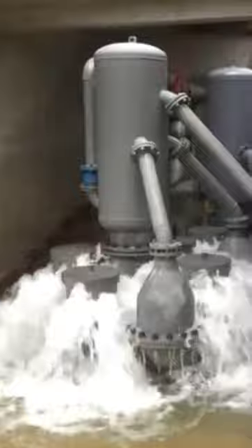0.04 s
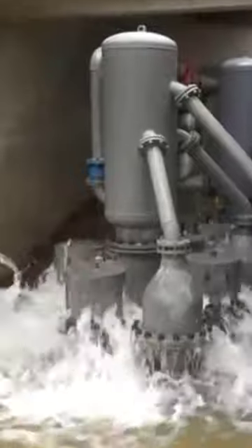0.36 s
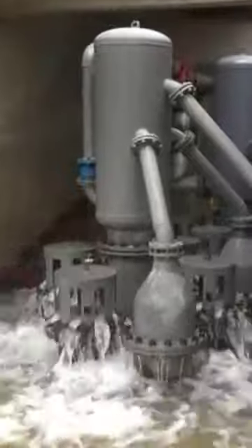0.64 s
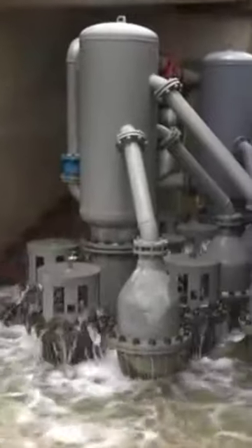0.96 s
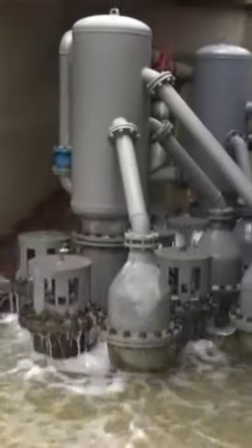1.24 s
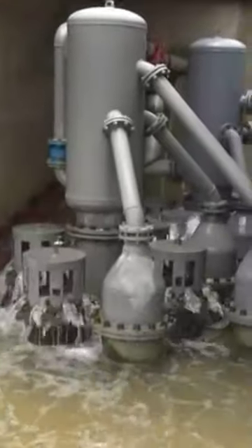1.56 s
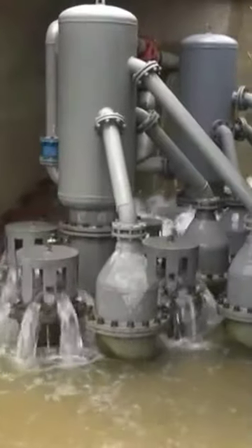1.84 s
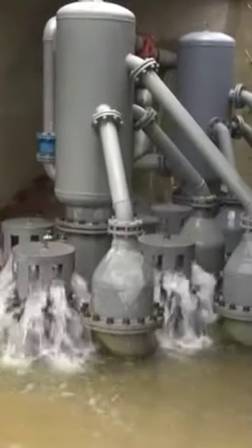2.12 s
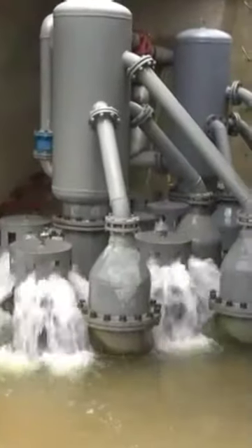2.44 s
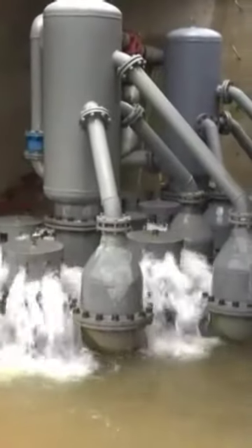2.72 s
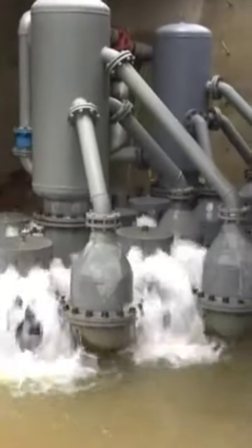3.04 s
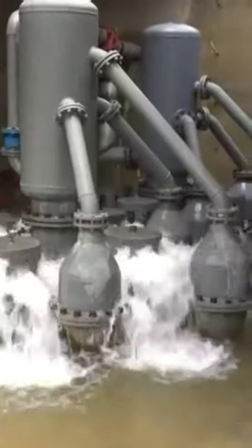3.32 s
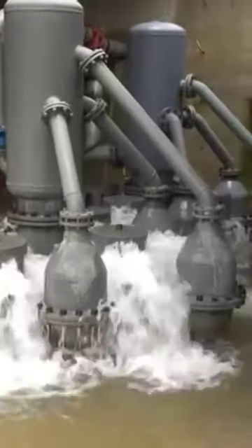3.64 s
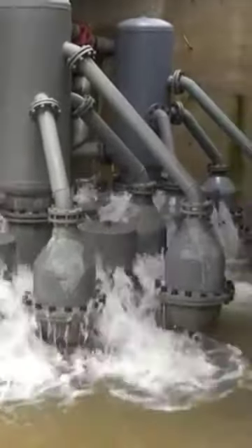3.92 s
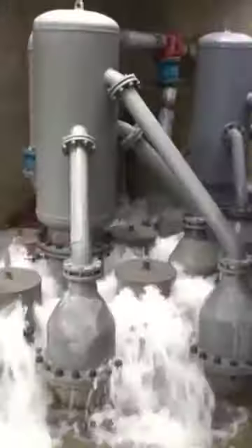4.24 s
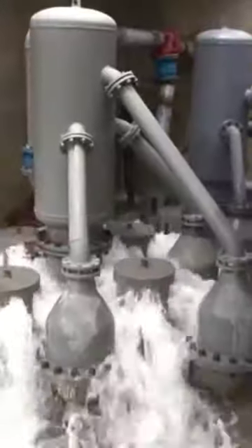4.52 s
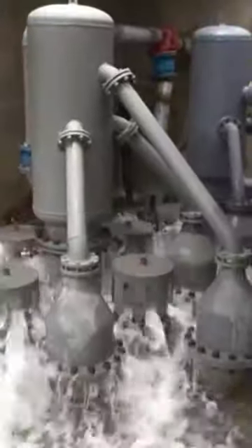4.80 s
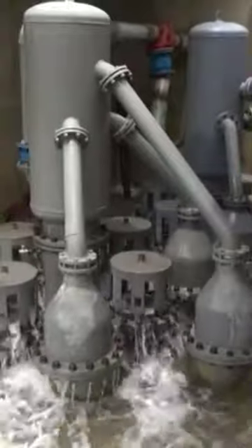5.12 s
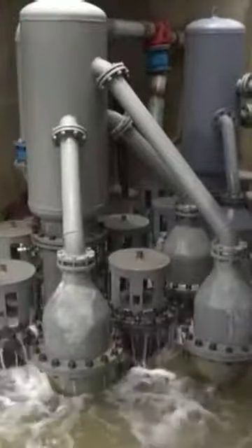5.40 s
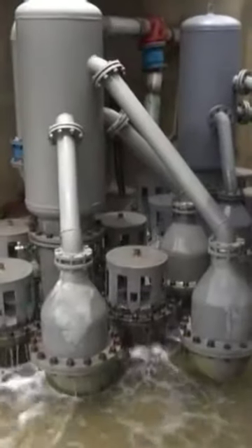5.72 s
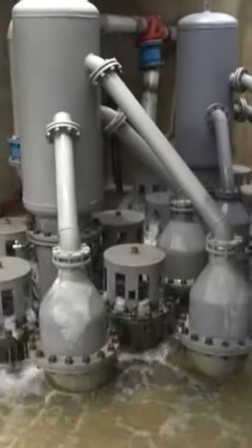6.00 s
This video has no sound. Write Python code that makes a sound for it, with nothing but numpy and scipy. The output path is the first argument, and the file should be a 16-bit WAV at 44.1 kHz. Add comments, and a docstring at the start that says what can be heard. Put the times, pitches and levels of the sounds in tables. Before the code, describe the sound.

Water rushes and splashes from the valves of large steel pumps in a concrete basin. Right at the start, valves slam shut with a deep boom, rebounding thuds, a metallic clank and a splashy crash, trailed by a thin high squeal. The water eases around 1 second, then swells. From about 1.7 to 2.3 seconds a second cluster of thuds arrives, with sharp rattling clanks and a hollow steel hum that rings on. The gush builds to its strongest near 3.8 seconds, when the longest round begins: heavy booms, knocks, crashes, bright snaps and short squeals, with another big slam at about 4.7 seconds. From 5 seconds the flow drains to a trickle, with hollow glugs, faint stuttering squeals and a fading low pipe drone. Near 6 seconds the water builds again. The sound is nearly mono, with the loudest thuds slightly squashed.

```python
"""Hydraulic ram pumps slam and boom in a concrete basin.
Water gushes ever faster from their waste valves until they slam shut, one after another. Each slam
booms up its drive pipe and comes back as a second thud, often with a splashy crash. Steel rings, shut
valves squeal and air pockets gulp, while a limiter turns everything down during the heaviest thuds."""
import sys
import numpy as np
from scipy import signal
from scipy.fft import rfft, irfft, next_fast_len
from scipy.io import wavfile
from scipy.ndimage import uniform_filter1d

SR = 44100
rng = np.random.default_rng(int(sys.argv[2]) if len(sys.argv) > 2 else 0)


def to_wav(sig):
    """Store sig (one row per channel, or 1-D mono) as 16-bit WAV at the path in sys.argv[1].

    Samples outside -1..1 are clipped; the rate is SR.
    """
    pcm = np.clip(np.atleast_2d(sig), -1, 1) * 32767
    pcm = np.round(pcm).astype(np.int16)
    wavfile.write(sys.argv[1], SR, pcm.T)  # frames by channels


N = 276066
T = np.arange(N) / SR
HZ = np.fft.rfftfreq(N, 1 / SR)

# Pressure surges behind the shut valves. Each row: start in seconds, pump name, force in dB,
# swell time in seconds, starting pitch in Hz.
SLAMS = [(0.106, "far", -16.5, 0.02, 215.6), (0.187, "near", -6.5, 0.035, 208),
         (1.712, "far", -21, 0.016, 227), (1.871, "next", -16, 0.031, 241.7),
         (2.02, "next", -21, 0.036, 246), (3.77, "far", -18.5, 0.017, 205),
         (3.812, "near", -8, 0.058, 222.8), (4.236, "next", -26.5, 0.029, 203),
         (4.58, "far", -23.5, 0.0085, 205), (4.656, "near", -10, 0.034, 200.8)]


def slams(rise=0.0072, sag_s=0.0837, overtone_ratio=2.36, overtone_db=-17.5, rebound_rumble_db=-9):
    """Water hammer: pressure swells and booms until its wave returns; then the water rebounds."""
    # Each pump: the wave's round trip and the fade time in seconds, resting pitch in Hz,
    # and the dB added to the force for boom, rumble and knock.
    pumps = { "near": dict(trip_s=0.164, t60=0.5, rest_hz=189.1, boom_db=3.5, rumble_db=-5.5, knock_db=-2),
             "next": dict(trip_s=0.14, t60=1.15, rest_hz=228, boom_db=0.5, rumble_db=-6, knock_db=0.5),
             "far": dict(trip_s=0.067, t60=0.34, rest_hz=205, boom_db=1, rumble_db=-5.5, knock_db=-27), }
    # The water bouncing back. Each row: start in seconds, boom in dB, hold in seconds, pitch in Hz,
    # knock in dB.
    rebounds = [(0.26, -13, 0.016, 203, -17.5), (0.316, -16, .015, 207, -24),
                (0.395, -21.5, 0.071, 222.8, -36), (0.525, -28, 0.04, 222, -30),
                (0.628, -43, 0.08, 211.3, -34), (1.786, -31, 0.064, 224, -29.5),
                (1.967, -14.5, 0.06, 228, -14.5), (2.142, -19, .11, 226.3, -20.5),
                (2.273, -27.5, 0.095, 230, -29), (3.995, -21, 0.099, 220.1, -27.5),
                (4.14, -30, 0.03, 213.7, -30), (4.381, -14, 0.024, 234.7, -21.5),
                (4.457, -27, 0.032, 205, -32.5), (4.635, -25, 0.026, 209.6, -31),
                (4.816, -22, .018, 236.6, -28), (4.89, -24, 0.028, 235, -27.5),
                (4.942, -27.5, 0.035, 228, -32.5), (5.013, -30, 0.022, 188.3, -50)]
    # Tone colours of the rumble and the knock. Each row: frequency in Hz, level in dB.
    rumble_spectrum = [(25, -17), (68, -7), (92, 0.5), (160, 2.5), (230, -2.5), (330, -14), (500, -39),
                       (1500, -36), (15000, -87)]
    knock_spectrum = [(150, -20), (290, 7), (470, 2), (620, -2), (950, -5.5), (1300, -14), (1700, -8),
                      (2700, -18), (4500, -27), (8000, -70), (15000, -68)]
    boom, rumble_power, knock_power = np.zeros((3, N))
    for start, name, db, swell_s, hz in SLAMS:
        pump, age = pumps[name], np.maximum(T - start, 0)
        swell = np.minimum(age / swell_s, 1) ** 2.8
        force = amp(db) * swell * burst(start, swell_s, pump["t60"], rise)
        force *= burst(start, pump["trip_s"], t60=0.14, rise=rise)  # the returning wave ends the push
        pitch = pump["rest_hz"] + (hz - pump["rest_hz"]) / (1 + (age / sag_s) ** 8)
        overtone = amp(overtone_db) * waver(overtone_ratio * pitch, wander_hz=20.1, rate_hz=50)
        boom += force * amp(pump["boom_db"]) * (waver(pitch, wander_hz=11.2, rate_hz=47.5) + overtone)
        rumble_power += (force * amp(pump["rumble_db"])) ** 2
        knock_power += (force * amp(pump["knock_db"])) ** 2
    for start, db, hold, hz, knock_db in rebounds:
        rebound = burst(start, hold, t60=0.25, rise=rise)
        boom += rebound * amp(db) * waver(hz, wander_hz=10.42, rate_hz=44)
        rumble_power += (rebound * amp(db + rebound_rumble_db)) ** 2
        knock_power += (rebound * amp(knock_db)) ** 2
    rumble = np.sqrt(rumble_power) * noise(rumble_spectrum)
    return boom + rumble + np.sqrt(knock_power) * noise(knock_spectrum)


def valve_blows():
    """A heavy valve strikes its seat, the rim it shuts against: a dull thud under a rough knock."""
    # Strikes and bounces. Each row: start in seconds, thud in dB, knock in dB, hold in seconds.
    blows = [(0.125, -27, -45, .035), (0.191, -19, -18, 0.027), (0.345, -23.5, -23, 0.026),
             (1.712, -26, -33, 0.021), (1.878, -19, -20, 0.012), (1.909, -22, -7.5, 0.0075),
             (1.963, -26.5, -16, 0.058), (2.103, -19, -28, 0.028), (3.774, -32, -26, 0.034),
             (3.815, -17.5, -21, 0.052), (4.044, -30, -22, 0.019), (4.234, -24.5, -25.5, 0.045),
             (4.31, -22, -27, 0.024), (4.341, -34, -19, 0.026), (4.564, -29.5, -34.5, 0.022),
             (4.664, -17, -17, 0.013)]
    # Tone colours of the thud and the knock. Each row: frequency in Hz, level in dB.
    thud_spectrum = [(25, -26), (68, -15), (92, 0.5), (140, 8), (220, 1), (400, -18), (1500, -45)]
    knock_spectrum = [(130, -18), (280, 5.5), (450, 4), (650, -1.5), (1000, -8.5), (2500, -16), (4500, -24),
                      (8000, -45)]
    thud_power, knock_power = np.zeros((2, N))
    for start, thud_db, knock_db, hold in blows:
        contact = burst(start, hold, t60=0.11, rise=0.0019)
        thud_power += (contact * amp(thud_db)) ** 2
        knock_power += (contact * amp(knock_db)) ** 2
    return np.sqrt(thud_power) * noise(thud_spectrum) + np.sqrt(knock_power) * noise(knock_spectrum)


def recoils(grit_db=2):
    """The returning wave collapses cavities in the water with a crash, a splash and bright snaps."""
    # Cavities collapsing. Each row: start in seconds, crash in dB, hold in seconds, splash in dB.
    crashes = [(0.342, -24.5, 0.088, -26.5), (2.035, -25, 0.035, -28.5), (3.891, -18, 0.046, -35),
               (4.022, -25.5, 0.07, -34), (4.834, -24, 0.052, -33.5)]
    # The sharpest collapses. Each row: start in seconds, level in dB.
    snaps = [(2.042, -40), (3.997, -25), (4.784, -42), (4.812, -31), (4.841, -19.5)]
    # Tone colours of the three sounds. Each row: frequency in Hz, level in dB.
    crash_spectrum = [(100, -46), (400, 13.5), (900, 6.5), (1350, 9), (1750, 11.5), (2200, 5), (3000, 3),
                      (4300, -0.5), (5500, -14), (9000, -25), (15000, -31)]
    splash_spectrum = [(200, -20), (1500, 8), (4500, 12), (8000, -4.5), (11000, 0), (15000, 3)]
    snap_spectrum = [(1000, -20), (4500, -2), (9000, -11), (13000, -7), (15000, 8)]
    crash_power, splash_power = np.zeros((2, N))
    for start, db, hold, splash_db in crashes:
        crash_power += (amp(db) * burst(start, hold, t60=6.1 * hold, rise=0.0028)) ** 2
        splash_power += (amp(splash_db) * burst(start, hold=0.018, t60=0.25, rise=0.0013)) ** 2
    snapping = sum(amp(db) * burst(start, hold=0.003, t60=0.056, rise=0.0004) for start, db in snaps)
    crash = np.sqrt(crash_power) * noise(crash_spectrum)
    splash = np.sqrt(splash_power) * noise(splash_spectrum)
    return (crash + splash + snapping * noise(snap_spectrum)) * amp(grit_db * drift(120))


def pump_hum(delay_s=0.02):
    """The hollow steel of two pumps swells into a hum under each of their slams and rings on."""
    # Tones of each pump's pipe and air vessel. Each row: pitch in Hz, level in dB, fade in seconds.
    near_tones = [(188, 2, 0.72), (235, -2.5, 1), (445, -9, 1.24), (488, 0, 0.24), (1408, -20.5, 3.2)]
    next_tones = [(176, 2.5, 0.99), (222.3, 5, 0.99), (299.7, 4.5, 0.65), (355, -1.5, 0.55), (563, -3.5, 1),
                  (599, -1.5, 0.34)]
    out = np.zeros(N)
    for name, tones, pump_db in [("near", near_tones, -11), ("next", next_tones, -6.5)]:
        pushes = [(start + delay_s, db) for start, pump, db, *_ in SLAMS if pump == name]
        for hz, db, t60 in tones:
            swing = bursts(pushes, hold=0.06, t60=t60, rise=0.036)
            out += amp(pump_db + db) * swing * waver(hz, wander_hz=0.00806 * hz, rate_hz=12.9)
    return out


def stem_clanks(hold=0.0051, rise=0.0013, chatter_db=2.5, rattle_db=-3):
    """A valve's steel stem rings and rattles as it chatters in its guide."""
    # The clanks. Each row: start in seconds, level in dB.
    hits = [(0.2, -26), (0.41, -34), (1.914, -23.5), (2.136, -21), (2.17, -33), (4.292, -27.5),
            (4.316, -34), (4.36, -34), (4.84, -36)]
    # The stem's ringing tones. Each row: pitch in Hz, level in dB, fade in seconds.
    tones = [(1130, -27, .3), (1700, 2.5, 0.59), (2000, 3, 0.22), (2073, 1, 0.16), (2680, -2, 0.35),
             (3110, 5, 0.17), (2960, 4, 0.13), (4960, -3, 0.2), (5040, -2.5, 0.44)]
    # Tone colour of the rattle. Each row: frequency in Hz, level in dB.
    rattle_spectrum = [(300, -24), (900, -1), (1500, 3), (2500, 6), (3250, -17), (3800, -16), (6000, -23),
                       (10000, -45)]
    ring = np.zeros(N)
    for hz, db, t60 in tones:
        swing = amp(db + chatter_db * drift(170)) * bursts(hits, hold, t60, rise)
        ring += swing * waver(hz, wander_hz=75, rate_hz=176)
    ring /= np.linalg.norm(amp([db for _, db, _ in tones]))
    rattle = bursts(hits, hold, t60=0.25, rise=rise) * noise(rattle_spectrum)
    return ring + rattle * amp(rattle_db + chatter_db * drift(160))


def squeals(stutter_hz=22, settle_db_per_s=24, flutter_db=0.5):
    """Water squeezes past a shut valve: one stuttering tone, with side tones that fade sooner."""
    # The squeals. Each row: start in seconds, main pitch in Hz, level in dB, hold and fade in seconds,
    # dB added for the side tones at first, stutter depth in dB.
    leaks = [(0.418, 4005, -38, 0.039, 0.99, 6.5, -3), (3.883, 4000, -33, 0.032, 0.33, 2, -1),
             (3.93, 4030, -23, 0.016, 0.1, -14, 1), (3.963, 3740, -38, 0.04, 0.23, -12, 10),
             (4.062, 4000, -34, 0.04, 0.62, -16, 2.5), (4.939, 4005, -41.5, 0.052, .2, -8, 6),
             (5.03, 4010, -43.5, 0.08, .2, -4, 3.5), (5.121, 4000, -39.5, 0.018, 0.34, -5, 4),
             (5.226, 4005, -48.5, 0.044, 0.31, -7, 5), (5.37, 3585, -53.5, .04, .22, -12, 3),
             (5.438, 3500, -52, .018, .18, -15, 1)]
    # The seat's side tones. Each row: pitch in Hz, level in dB.
    side_tones = [(3717, -4), (3945, -2), (4065, -4), (4140, -7), (4281, -5), (2440, -10)]
    main, side_power = np.zeros((2, N))
    for start, hz, db, hold, t60, side_db, stutter_db in leaks:
        age = np.maximum(T - start, 0)
        push = amp(db) * burst(start, hold, t60, rise=0.0034)
        stutter = np.sin(2 * np.pi * stutter_hz * age)  # the seat sticks and slips
        main += push * waver(hz, wander_hz=14, rate_hz=60.6) * amp(stutter_db * stutter)
        side_power += (push * amp(side_db - settle_db_per_s * age)) ** 2
    cluster = sum(amp(db + 0.96 * drift(120)) * waver(hz, wander_hz=34.2, rate_hz=160)
                  for hz, db in side_tones)
    return (main + np.sqrt(side_power) * cluster) * amp(flutter_db * drift(51))


def cover_ring(hold=0.01, rise=0.0037, chatter_db=2.5):
    """The steel cover over a valve is jolted by the recoil and rings on."""
    # The jolts. Each row: start in seconds, level in dB.
    jolts = [(0.407, -33.5), (4.04, -37.5), (4.845, -39)]
    # The cover's ringing tones. Each row: pitch in Hz, level in dB, fade in seconds.
    tones = [(1080, -2, 0.46), (1590, 1, 0.46), (1795, 0, .4), (2020, -8, 1.2), (2400, -4, 2),
             (2500, -11, 1.6), (2730, 0, 0.64), (3390, -5, 0.2), (3640, -0.5, 0.47), (4005, -7.5, 1.8),
             (4270, -2.5, 0.85), (6280, -4.5, 0.2)]
    out = np.zeros(N)
    for hz, db, t60 in tones:
        swing = sum(amp(jolt_db) * burst(start, hold, t60, rise) for start, jolt_db in jolts)
        out += amp(db + chatter_db * drift(90)) * swing * waver(hz, wander_hz=47.9, rate_hz=174)
    return out


def pipe_drone():
    """The long drive pipe keeps humming low after a round of slams."""
    # Pushes on the pipe. Each row: start in seconds, level in dB.
    pushes = [(2.1, -48), (4.8, -41.5)]
    swing = sum(amp(db) * burst(start, hold=0, t60=3.1, rise=0.092) for start, db in pushes)
    return swing * waver(hz=79, wander_hz=0.8, rate_hz=16)


def glugs(small_db=-51):
    """Air pockets wobble under the valve covers: a few large ones among many small."""
    # Large pockets gulping as the water drains. Each row: start in seconds, level in dB, pitch in Hz,
    # fade in seconds.
    pockets = [(5.144, -33.5, 378, 0.13), (5.168, -38, 314, 0.39), (5.215, -46, 420.6, .3),
               (5.272, -39, 720, 0.14), (5.28, -41, 324, .25), (5.335, -41, 325, .25),
               (5.37, -40.5, 414, 0.44), (5.425, -44, 466, .3), (5.65, -45, 300, 0.57),
               (5.975, -37, 282.6, 0.27)]
    large = sum(amp(db) * burst(start, 0.013, t60, rise=0.003) * waver(hz, wander_hz=10.95, rate_hz=28.3)
                for start, db, hz, t60 in pockets)
    return large + amp(small_db) * bubbles(count=70, low_hz=249, high_hz=562, cycles=18, spread_db=2.5)


def water(usual_flow_db=-34, drops_db=-8, gurgle_db=-18, low_split_hz=850, high_split_hz=5000):
    """Water pours from the open valves: a wash of drops and bubbles that follows the flow."""
    # The outflow, building up to the slams and draining after. Each row: time in seconds, level in dB.
    flow = [(0.12, -30), (0.6, -34.5), (0.92, -37.5), (1.8, -31.5), (2.5, -34.5), (3.1, -33), (3.78, -27),
            (4.2, -35), (4.64, -32.5), (5.15, -37.5), (5.5, -45), (5.72, -44.5), (5.92, -38.5),
            (6.25, -33.5)]
    # Tone colour of the water. Each row: frequency in Hz, level in dB.
    spectrum = [(24, -70), (40, -24), (63, -20), (108, -10), (174, -2.5), (241, -2), (407, -4.5),
                (535, -2.5), (1020, -3.5), (2330, -7.5), (2640, -9.5), (4130, -11), (8960, -21.5),
                (14400, -12), (15500, -16)]
    flow_db = np.interp(T, *np.transpose(flow)) - usual_flow_db
    drops = bubbles(count=20000, low_hz=241.2, high_hz=9100, cycles=3.64, spread_db=0)
    gurgle = bubbles(count=1000, low_hz=282.6, high_hz=2626, cycles=19, spread_db=1)
    foam = rng.standard_normal(N) + amp(drops_db) * drops + amp(gurgle_db) * gurgle
    churn = 1 / (1 + (HZ / low_split_hz) ** 6)
    spray = 1 - 1 / (1 + (HZ / high_split_hz) ** 8)
    gush = 1 - churn - spray
    # Each row: filter, dB at the usual flow, dB gained per dB of flow, steady trickle and flicker in dB.
    bands = [(churn, -34.5, 1, -69, 0.55), (gush, -34, 1, -70, 0.55), (spray, -41.5, 1.35, -51, 0.45)]
    slosh_db = 0.28 * drift(15)
    out = np.zeros(N)
    for band, db, growth, trickle_db, flicker_db in bands:
        level = np.hypot(amp(db + growth * flow_db), amp(trickle_db))
        wash = unit(colour(foam, shape(spectrum) * band))
        out += wash * level * amp(slosh_db + flicker_db * drift(21))
    return out


def bubbles(count, low_hz, high_hz, cycles, spread_db):
    """Bubbles and drops ping at random times, rising in pitch; more cycles make a longer ring."""
    pings, out = [], np.zeros(N + SR)
    for hz in np.geomspace(low_hz, high_hz, 60):
        decay = np.arange(0, 6, hz / cycles / SR)[:SR]
        pings.append(np.sin(2 * np.pi * cycles * decay * (1 + 0.0142 * decay)) * np.exp(-decay) * hz)
    when, which, chance = rng.random((count, 3)).T
    sizes = amp(spread_db * np.minimum(-np.log(1 - chance), 4))
    for at, k, size in zip((when * N).astype(int), (which * len(pings)).astype(int), sizes):
        out[at:at + len(pings[k])] += size * pings[k]
    return unit(out[:N])


def amp(db):
    """Turns decibels into a gain."""
    return 10 ** (np.asarray(db) / 20)


def unit(x):
    """Scales a signal to an average strength (rms) of 1."""
    return x / np.sqrt(np.mean(x ** 2) + 1e-20)


def shape(spectrum):
    """A gain for every frequency, from a few rows of Hz and dB."""
    hz, db = np.transpose(spectrum)
    return amp(np.interp(np.log(HZ + 1), np.log(hz), db))


def colour(x, gain):
    """Filters a signal with one gain per frequency."""
    return irfft(rfft(x) * gain, N)


def noise(spectrum):
    """Noise of strength 1 with the given tone colour."""
    return unit(colour(rng.standard_normal(N), shape(spectrum)))


def drift(rate_hz, step=32):
    """A smooth random wobble of strength 1, mostly slower than rate_hz."""
    t = T[::step]
    size = next_fast_len(len(t))
    hz = np.fft.rfftfreq(size, step / SR)
    chance = rng.standard_normal(len(hz)) + 1j * rng.standard_normal(len(hz))
    slow = irfft(chance / (1 + (hz / rate_hz) ** 4), size)
    return np.interp(T, t, unit(slow[:len(t)]))


def waver(hz, wander_hz, rate_hz):
    """A tone of strength 1 whose pitch shakes at random."""
    turns = np.cumsum(hz + wander_hz * drift(rate_hz)) / SR + rng.random()
    return np.sqrt(2) * np.sin(2 * np.pi * (turns % 1).astype(np.float32))


def burst(start, hold, t60, rise):
    """A loudness curve that rises, holds, then fades by 60 dB in t60; all times are in seconds."""
    out = np.zeros(N)
    live = slice(max(int(start * SR) + 1, 0), int((start + hold + 2 * t60) * SR))
    age = T[live] - start
    out[live] = (1 - np.exp(-age / rise)) * np.exp(-np.log(1000) * np.maximum(age - hold, 0) / t60)
    return out


def bursts(hits, hold, t60, rise):
    """One loudness curve for several hits, whose powers add up."""
    return np.sqrt(sum((amp(db) * burst(start, hold, t60, rise)) ** 2 for start, db in hits))


def basin():
    """All the sources together, with fresh randomness on each call."""
    steel = pump_hum() + pipe_drone() + stem_clanks() + cover_ring()
    return water() + glugs() + valve_blows() + slams() + recoils() + steel + squeals()


def scene():
    """Nearly mono: the walls scatter a little sound to the sides, and the deep bass leans left."""
    # Stereo width. Each row: frequency in Hz, side minus middle in dB.
    width = [(60, -35), (110, -20), (200, -29), (380, -18.5), (700, -27), (1290, -31), (2380, -95),
             (4400, -20.5), (8120, 0.5), (15000, -28)]
    # Stereo balance. Each row: frequency in Hz, left minus right in dB.
    balance = [(30, 0), (75, 3.5), (140, 2), (250, -0.5), (500, -1.5), (1000, 0)]
    mid, side = basin(), colour(basin(), shape(width))
    lean = np.sqrt(shape(balance))
    return np.array([colour(mid + side, lean), colour(mid - side, 1 / lean)])


def record(dry, limit_db=-18, recover_db_per_s=170, squeeze=0.84, start_s=0.118, top_hz=15600):
    """A quick limiter holds the thuds down; the sound begins at start_s and is cut above top_hz."""
    power = uniform_filter1d((dry ** 2).mean(0), size=400)
    power_db = 10 * np.log10(abs(power) + 1e-12)
    fall = T * recover_db_per_s
    peak_db = np.maximum.accumulate(power_db + fall) - fall  # jumps up at once, sinks steadily
    over_db = np.maximum(peak_db - limit_db, 0)
    held = dry * amp(-squeeze * uniform_filter1d(over_db, size=150)) * (T >= start_s)
    lowpass = signal.firwin(511, top_hz, window=("kaiser", 9), fs=SR)
    return signal.oaconvolve(held, lowpass[None], "same")


dry = scene()
out = record(dry)
to_wav(out)
```